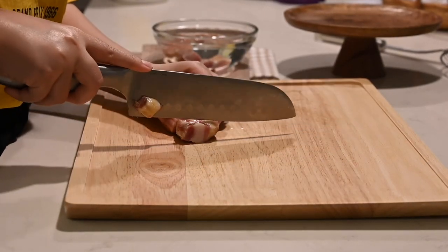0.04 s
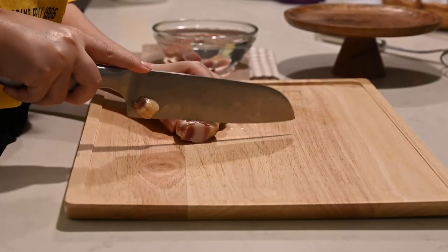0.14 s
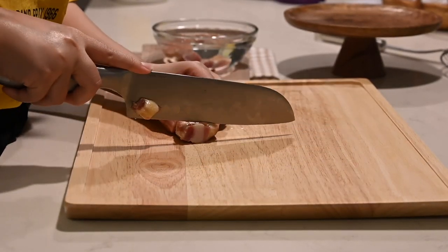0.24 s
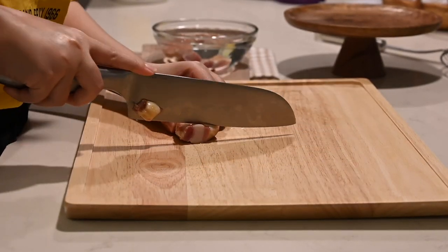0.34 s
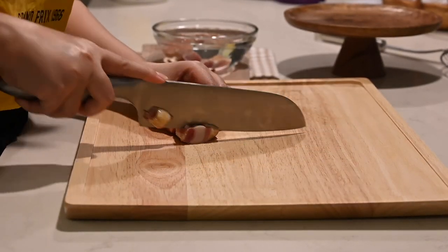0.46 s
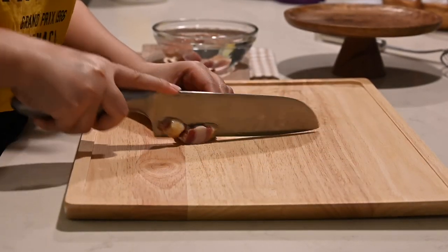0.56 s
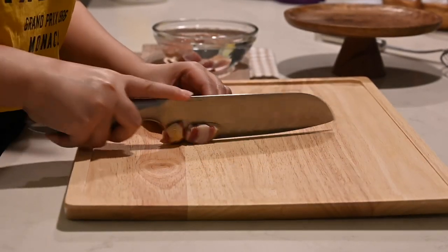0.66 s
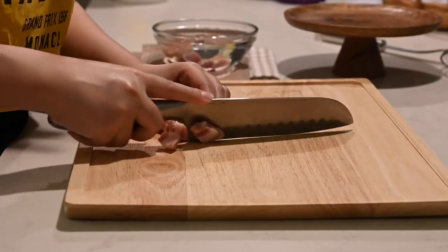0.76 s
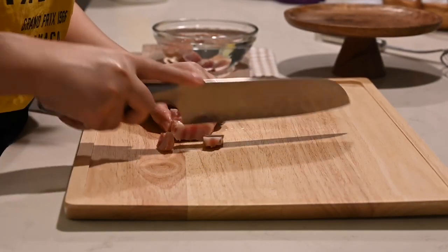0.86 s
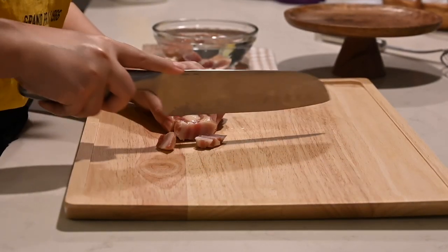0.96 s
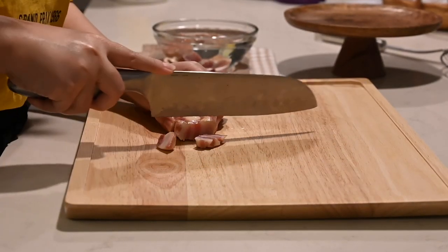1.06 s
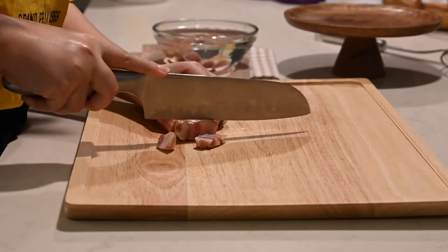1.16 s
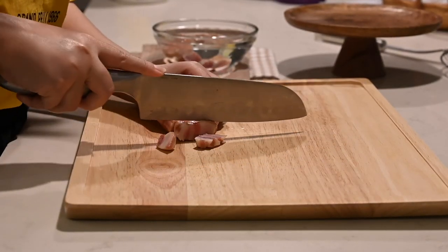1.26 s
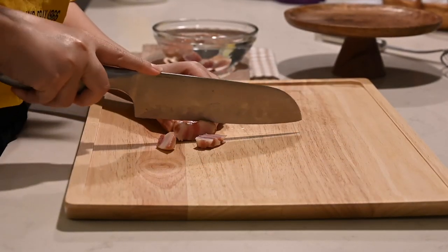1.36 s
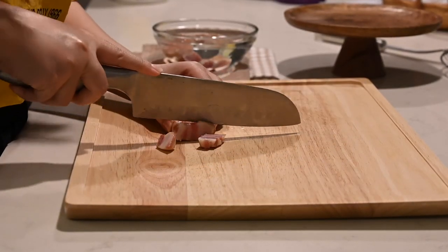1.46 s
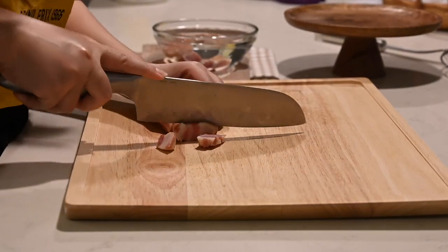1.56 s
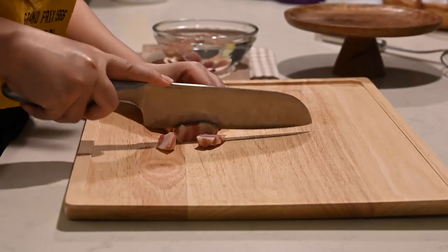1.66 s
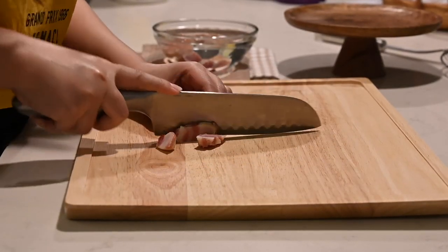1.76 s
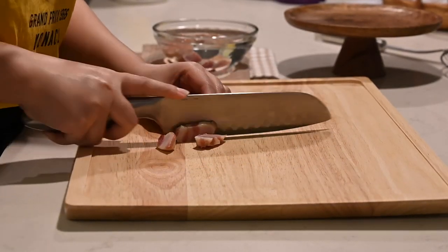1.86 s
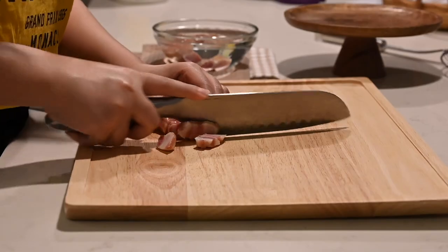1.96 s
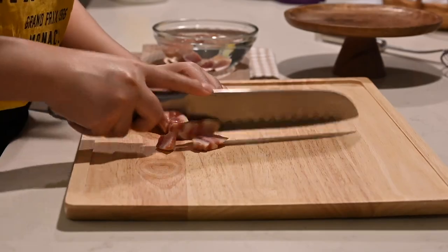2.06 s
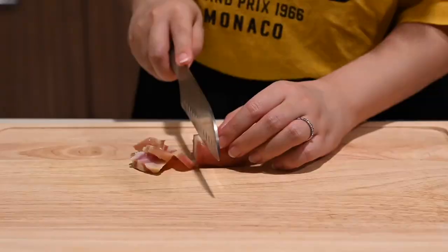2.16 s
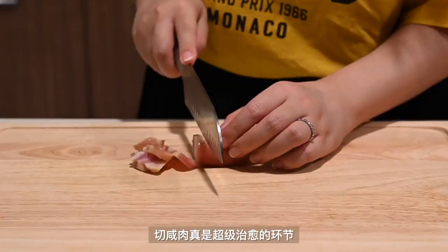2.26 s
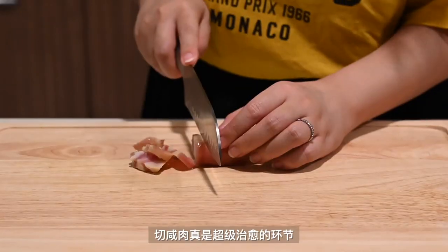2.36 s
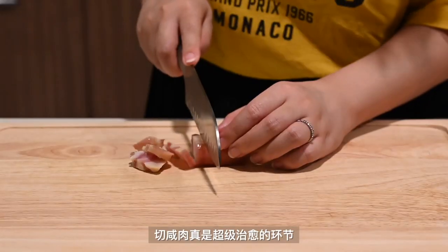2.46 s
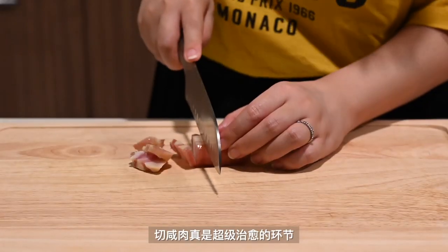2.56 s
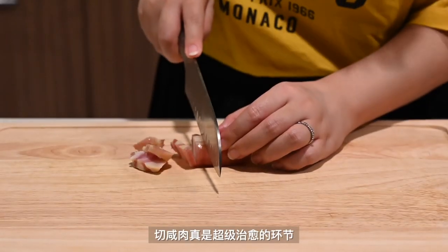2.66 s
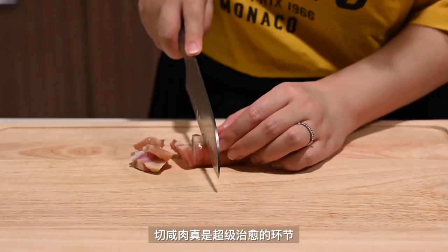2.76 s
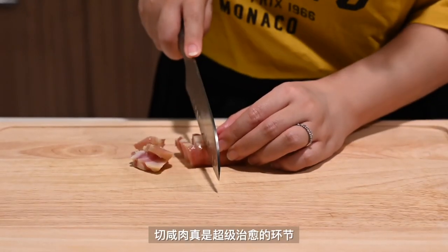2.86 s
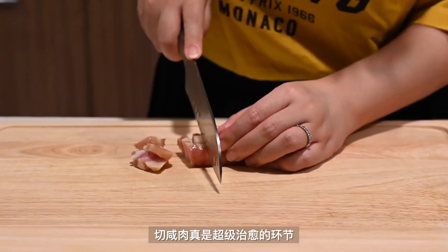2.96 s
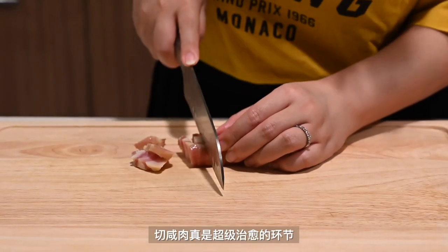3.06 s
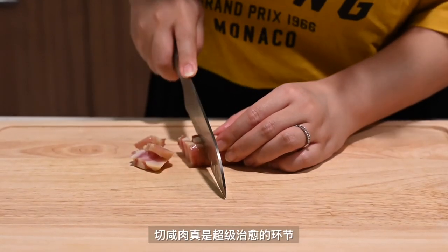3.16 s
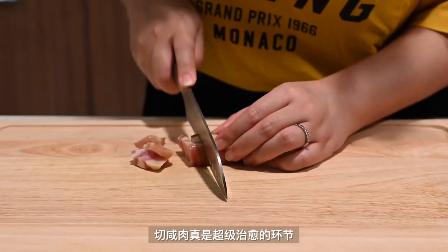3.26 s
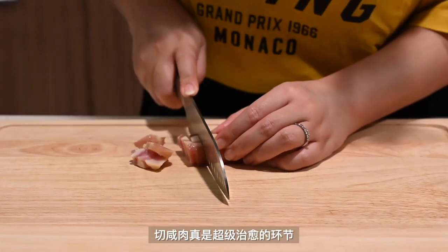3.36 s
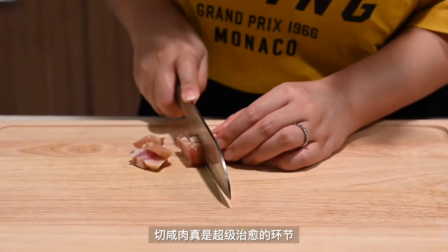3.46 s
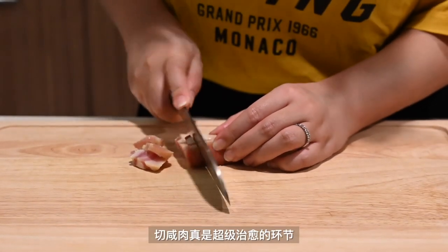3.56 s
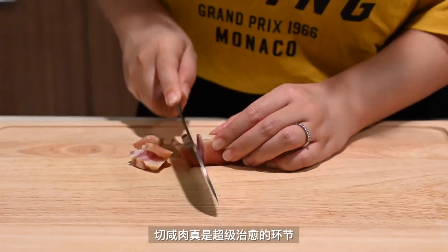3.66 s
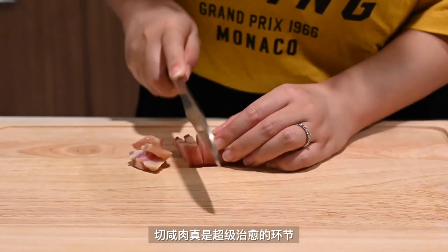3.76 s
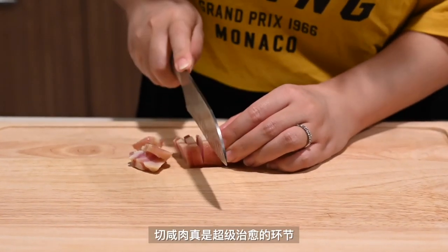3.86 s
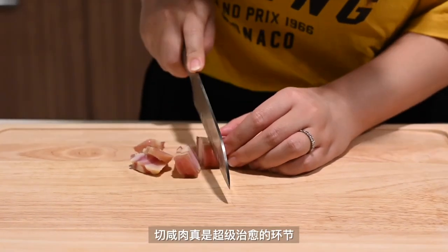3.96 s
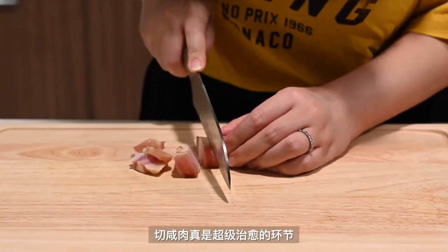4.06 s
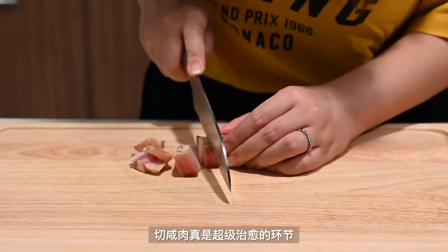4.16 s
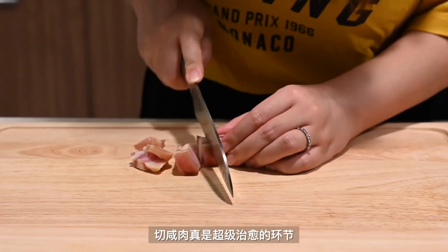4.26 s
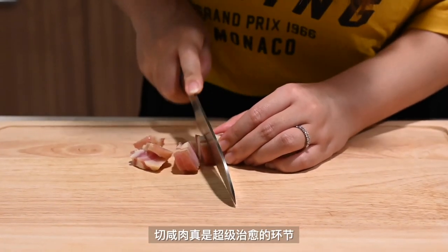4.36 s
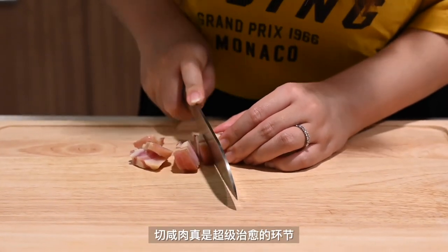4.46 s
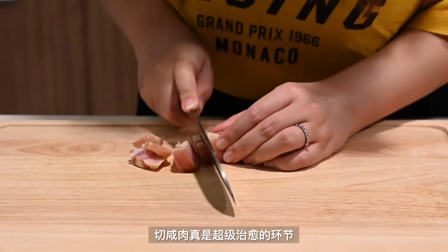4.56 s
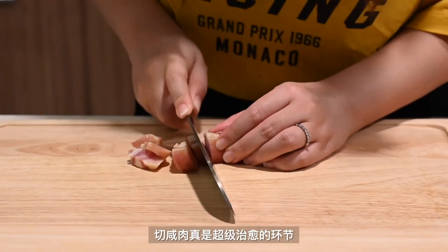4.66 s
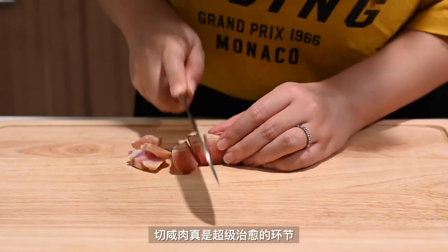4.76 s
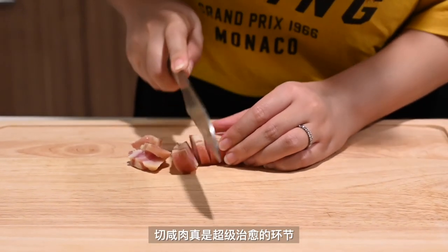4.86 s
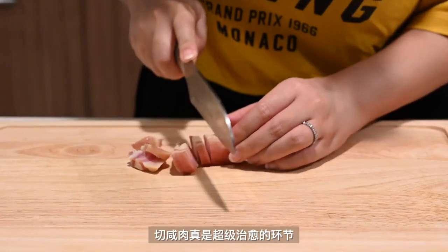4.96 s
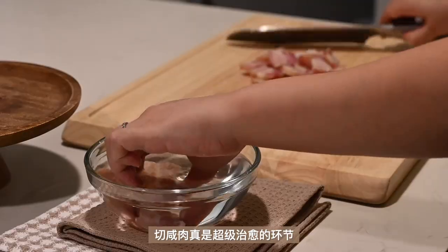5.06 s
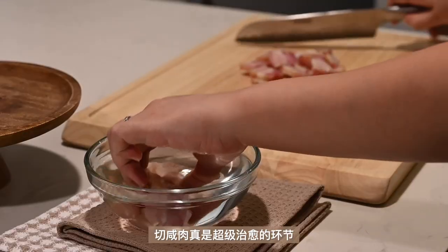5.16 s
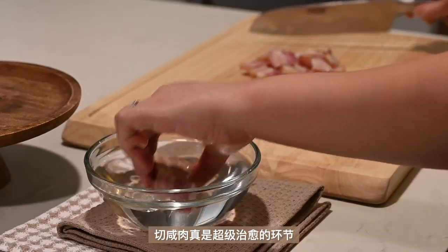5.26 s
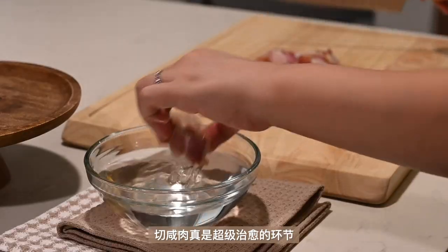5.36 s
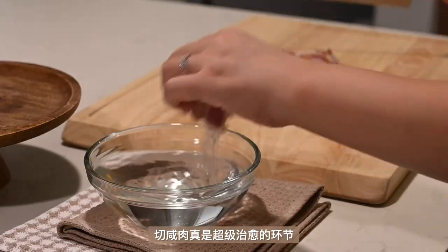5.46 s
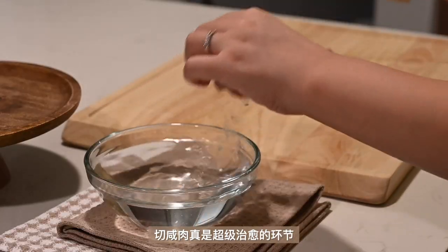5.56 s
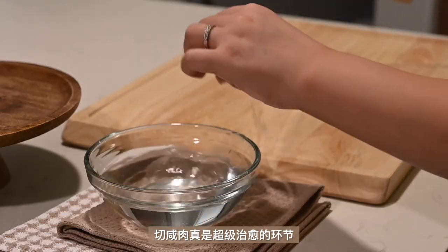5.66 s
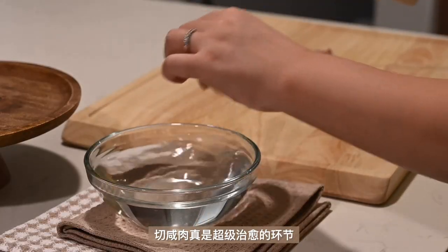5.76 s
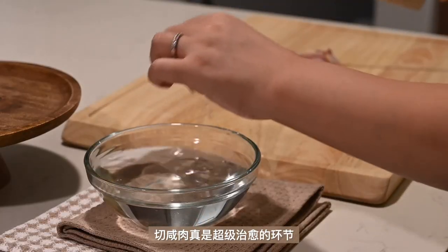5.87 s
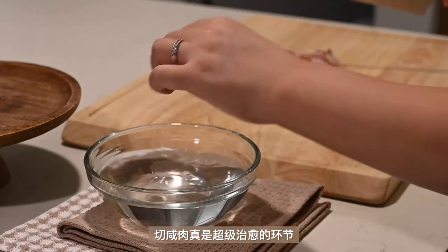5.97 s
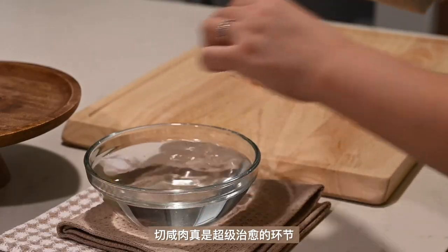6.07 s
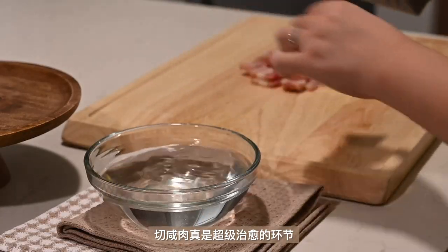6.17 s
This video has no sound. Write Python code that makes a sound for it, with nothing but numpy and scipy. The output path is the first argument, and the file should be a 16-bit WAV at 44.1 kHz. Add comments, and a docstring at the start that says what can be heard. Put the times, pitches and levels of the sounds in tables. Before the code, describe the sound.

In a quiet, hard-walled kitchen with a low fridge-like hum, a knife cuts cured meat with short gritty rasps and sharp woody knocks on a board. The first knocks are echoing, heard from the side; later ones are drier and closer, from the front. Finally a glass bowl is nudged and rings softly, a quick cluster of drips falls into water, and a hand lightly brushes wood twice.

```python
"""Knife and cured meat on a wooden board

A steel knife saws through cured meat (stick-slip noise) and knocks on a board (struck modes) in a hard-walled
kitchen, from the side, then the front; then, beside a glass bowl, the bowl is nudged and rings, water drips
(gliding bubbles over splashes, the glass ringing on) and a hand brushes wood (coloured noise). Under the room
noise hums what is likely a fridge; two close microphone ports hear the bass alike."""
import sys
import numpy as np
from scipy import signal
from scipy.fft import rfft, irfft
from scipy.io import wavfile
from scipy.ndimage import uniform_filter1d

SR = 44100
rng = np.random.default_rng(int(sys.argv[2]) if len(sys.argv) > 2 else 0)


def waveform_to_disk(signal):
    """Save audio, clipped to [-1, 1], as 16-bit WAV at the path in sys.argv[1]."""
    frames = np.transpose(np.atleast_2d(signal))
    scaled = np.clip(frames, -1, 1) * 32767
    samples = np.round(scaled).astype(np.int16)
    wavfile.write(sys.argv[1], SR, samples)


N = 274302
T = np.arange(N) / SR


def undb(db):
    """Amplitude factor of a level in dB."""
    return 10 ** (np.asarray(db) / 20)


def unit(x):
    """Scale to rms 1."""
    return x / np.sqrt(np.mean(x ** 2))


def ring(x, hz, t60):
    """One decaying mode driven by x: a complex one-pole resonator."""
    t60 = np.clip(t60, .003, 1.2)
    pole = np.exp(2j * np.pi * hz / SR - np.log(1000) / (t60 * SR))
    return signal.lfilter([1], [1, -pole], x).imag


def band(x, hz, width):
    """Resonance with gain 1 at its centre."""
    b, a = signal.iirpeak(hz, hz / width, SR)
    return signal.lfilter(b, a, x)


def highpass(x, order, hz):
    """Butterworth cut of everything below hz."""
    return signal.sosfilt(signal.butter(order, hz, "high", fs=SR, output="sos"), x)


def add(out, s, piece):
    """Mix a short sound in at time s."""
    i = int(s * SR)
    out[i:i + len(piece)] += piece[:N - i]


def walk(rate):
    """Random levels, a new one rate times a second, slewed from one to the next; spread near 1."""
    hold = max(int(SR / rate), 100)  # samples
    steps = np.repeat(rng.standard_normal(N // 100 + 1), hold)[:N]
    return 1.2 * uniform_filter1d(steps, hold)


def grains(spread_db):
    """Dense slips of uneven size."""
    sizes = undb(spread_db * rng.exponential(size=N))
    return unit(rng.standard_normal(N) * sizes)


def crack(t, t60, hz, width):
    """A short burst of noise around hz, dying away from rms 1."""
    burst = band(band(rng.standard_normal(len(t)), hz, width), hz, width)
    return unit(burst) * undb(-60 * t / t60)


def colour(x, peaks):
    """Steep resonances (each applied twice), rms 1."""
    return unit(sum(undb(db) * band(band(x, hz, width), hz, width) for hz, width, db in peaks))


def stroke(start, hold, rise_db_s, fall_db_s):
    """Gain of one movement: it swells to 1, holds, then dies away."""
    before = np.maximum(start - T, 0)
    after = np.maximum(T - start - hold, 0)
    return undb(-rise_db_s * before - fall_db_s * after)


def place(s):
    """Index of the microphone place at time s: side, front, beside the bowl."""
    # the microphone stands at a new place from each moment on: (time [s])
    moves = [0, 2.181, 4.96, 7]
    return np.searchsorted(moves, s, side="right") - 1


def background():
    """Room air in (mid, side) whose level drifts a little, with a wavering hum and drone, likely a fridge."""
    # spectrum of the room air, overall level set apart: (frequency [Hz], density [dB per Hz])
    air_spectrum = [(12, -63), (30, -2.5), (74, -5), (107, -6), (142, -3.5), (241, -3.5), (270, -16),
                    (347, -6.5), (499, -9), (825, -10.5), (1440, -14.5), (2750, -19.5), (16000, -32.5)]
    # room air at each microphone place: (level [dB])
    air_levels = [-61, -62.5, -62]
    # hum bands: (frequency [Hz], width [Hz], level from side [dB], from front [dB], by the bowl [dB])
    hum_bands = [(100, 2.7, -68, -73.5, -73), (205, 47, -69, -99, -76), (316.4, 39, -66, -70.5, -75.5),
                 (370, 220, -70.5, -76, -83), (55.7, 4.7, -80.5, -73, -68)]
    hz, db = np.transpose(air_spectrum)
    f = np.maximum(np.fft.rfftfreq(N, 1 / SR), 1)
    shape = undb(np.interp(np.log(f), np.log(hz), db))
    air = irfft(rfft(rng.standard_normal((2, N))) * shape, N)
    here = place(T)
    air = air / np.std(air[0]) * undb(np.array(air_levels)[here] + 0.13 * walk(2.72))
    for hum_hz, width, *levels in hum_bands:
        hum = unit(band(rng.standard_normal(N), hum_hz, width))
        air[0] += hum * undb(np.array(levels)[here])
    return air


def kitchen(echoes, room_db):
    """Response (mid, side): the direct sound, first echoes, then a tail that swells in and fades by band."""
    # decay of the room: (frequency [Hz], t60 [s])
    decay = [(125, 0.26), (250, 0.52), (500, 0.62), (1000, 0.63), (2000, 0.55), (4000, 0.11), (12000, 0.19)]
    t = np.arange(SR) / SR
    hz, t60 = np.transpose(decay)
    tail = np.zeros((2, SR))
    for f in 100 * 2. ** np.arange(0, 7.6, .5):
        fade = undb(-60 * t / np.interp(np.log(f), np.log(hz), t60))
        tail += band(rng.standard_normal((2, SR)), f, f / 2) * fade / np.sqrt(f)
    tail = np.diff(tail, prepend=0) + 0.11 * tail  # evens out the spectrum
    tail = highpass(tail, 4, 242)  # the room gives back little below this
    tail *= 1 - np.exp(-(t / .01) ** 2)
    out = undb(room_db) * tail / np.sqrt(np.sum(tail[0] ** 2))
    out[1] *= undb(-4)  # the tail is weaker in the side signal
    out[0, 0] += 1  # direct sound
    for ms, db, share in echoes:
        out[:, int(ms * SR / 1000)] += undb(db) * np.array([1, share])
    return out


def brushing():
    """Skin drags over the grain of the wood: uneven slips through broad resonances."""
    # hand over the board: (start [s], hold [s], level [dB])
    hand_strokes = [(5.842, 0.045, -61), (6.127, 0.012, -60.5)]
    # colour of skin on wood, each resonance applied twice: (frequency [Hz], width [Hz], gain [dB])
    skin_peaks = [(900, 650, -11), (1500, 1100, 5), (2100, 2800, 20), (3600, 2000, -13), (6650, 4000, -6)]
    drag = sum(undb(db) * stroke(s, hold, rise_db_s=169, fall_db_s=147) for s, hold, db in hand_strokes)
    return drag * colour(grains(3.3) * undb(0.63 * walk(30)), skin_peaks)


def water_and_ticks():
    """Tones that rise in pitch and waver as they fade, each over a splash: bubbles, and the glass ringing on;
    small ticks are short noise bursts."""
    # drops into the bowl; the two rows with t60 near half a second are the glass ringing on:
    # (time [s], peak [dB], frequency [Hz], t60 [s], upward glide [share of frequency])
    drips = [(5.52, -51.5, 4880, .025, 0.035), (5.53, -62, 10300, 0.0089, .04),
             (5.536, -47.5, 3700, 0.026, 0.19), (5.536, -56.5, 2220, 0.44, 0.015),
             (5.543, -56, 4800, 0.013, 0.33), (5.55, -61, 3300, 0.012, 0.23),
             (5.555, -60, 12900, .012, .03), (5.577, -47, 2990, 0.024, 0.022),
             (5.59, -54.5, 5950, 0.053, 0.092), (5.599, -68, 3320, 0.48, 0.015)]
    # small ticks: (time [s], starting level [dB], frequency [Hz], width [Hz])
    ticks = [(0.413, -66.5, 8400, 5000), (1.13, -64, 4440, 607), (1.235, -80, 11000, 4000),
             (1.295, -60.5, 3030, 800), (3.663, -57.5, 5780, 1500), (5.972, -62, 9500, 4000)]
    splash_db = -12.5  # relative to each row's tone
    out, t = np.zeros(N), np.arange(SR // 2) / SR
    for s, db, hz, t60, glide in drips:
        rise = glide * (1 - np.exp(-6 * t / t60))
        pitch = hz * (1 + rise + 0.032 * walk(141)[:len(t)])
        tone = undb(db - 60 * t / t60) * np.sin(2 * np.pi * np.cumsum(pitch) / SR)
        add(out, s, tone)
        add(out, s, undb(db + splash_db) * crack(t, 0.02, 4800, 8000))
    for s, db, hz, width in ticks:
        add(out, s, undb(db) * crack(t, 0.022, hz, width))
    return out


def nudged_bowl():
    """The bowl's foot slips briefly over the cloth and sets the glass ringing."""
    # modes of the glass bowl and the worktop under it: (frequency [Hz], gain [dB], t60 [s])
    bowl_modes = [(60, -5, 0.11), (280, -8, 0.1), (888, -5.5, 0.34), (1251, 4, 0.067), (1110, -4, .04),
                  (1350, -3, 0.055), (1510, -7, 0.036), (1800, 6, 0.0098), (2220, -11, 0.19),
                  (2900, -17, 0.036), (4002, -17, 0.42), (4560, -20, .03), (4870, -26, .15),
                  (5790, -31, 0.33), (8000, -22, 0.22), (9100, -17, 0.043), (9900, -21, .04),
                  (10840, -22, .05), (11700, -32, .08)]
    scrape = stroke(5.125, hold=0.022, rise_db_s=444, fall_db_s=600)
    slips = undb(-48) * scrape * grains(3.0)
    # reference: how strongly steady noise rings the first four modes
    reference = np.std(sum(undb(db) * ring(grains(0), hz, t60) for hz, db, t60 in bowl_modes[:4]))
    return sum(undb(db) * ring(slips, hz, t60) for hz, db, t60 in bowl_modes) / reference


def board(force, column, parts_db, longer=1):
    """The board's modes, driven by force; each radiates only near its own pitch."""
    # the first mode is the board bouncing on the worktop:
    # (frequency [Hz], t60 before longer [s], gain from the side [dB], gain from the front [dB])
    board_modes = [(149.9, 0.27, -24.5, -16), (299, 0.016, -22.5, -8.5), (361, 0.025, -13, -4.5),
                   (489, 0.043, -30, -3), (548.7, 0.038, -2, -1), (696.4, 0.032, 0.5, -1.5),
                   (987, 0.02, 6, -2.5), (1054, 0.018, 7, 8), (1205, 0.022, -13, -13),
                   (1502, 0.029, -16.5, -9.5), (1828, 0.0054, -9, 7), (2126, 0.023, -3, -7.5),
                   (2536, 0.0066, 0.5, -2), (3074, 0.0053, 8.5, -12), (3700, 0.0074, 8, -24),
                   (4680, 0.017, -54, -35), (5500, 0.004, -57, -67)]
    # from the side the bounce is a short dull thump: (frequency [Hz], t60 before longer [s], gain [dB])
    side_bounce = (111, 0.039, -23)
    low_hz, high_hz = 420, 1500  # low modes lie below, high modes above
    bounce_db, low_db, high_db = parts_db
    modes = []
    for k, (hz, t60, *gains) in enumerate(board_modes):
        if k == column == 0:
            hz, t60, gains[0] = side_bounce
        if k == 0:
            part_db = bounce_db
        else:
            part_db = low_db * (hz < low_hz) + high_db * (hz > high_hz)
        ringing = ring(force, hz, longer * t60)
        radiated = band(band(ringing, hz, hz), hz, 1.2 * hz)
        modes.append(undb(gains[column] + part_db) * radiated)
    # the board is too small to send its bending modes' bass into the air
    bending = highpass(sum(modes[1:]), 3, 250)
    return modes[0] + bending


def knocks():
    """Each knock is a half-sine push; a longer contact leaves the high modes still; a crack is added."""
    # blade on board, and soft thuds as the board bounces again (3.529, 4.547):
    # (time [s], peak before the crack [dB], contact [ms], board bounce [dB], low modes [dB], high modes [dB])
    hits = [(0.5575, -18, 0.39, -16, 11, 8.5), (0.669, -34, 1.54, 13, 6, 0), (.687, -31.5, 2.2, 5, 12, -1),
            (0.7691, -28.5, 0.73, -13, 5.5, 5.5), (1.7578, -15.5, 0.4, -6, 9.5, 6.5),
            (1.877, -49, 2.7, 27, 14, 0), (1.892, -43, 2.4, 13, 22, 0), (2.034, -19, 0.4, -34, 7, 2.5),
            (3.1535, -24.5, 0.21, -7.5, 8.5, -1), (3.472, -34.5, 0.42, 3, 7, -17),
            (3.475, -37.5, 3.8, 18, 23, -2), (3.529, -51, 3.5, 18, -6, -4), (4.28, -46.5, 1.4, 8, 10.5, 0),
            (4.3686, -8.5, 0.28, -19, 0, -0.5), (4.4974, -29, 0.19, 6, 4, 26),
            (4.498, -18, 1.26, -3.5, 9.5, -12), (4.547, -39, 2.1, 17, 1, -2),
            (4.6378, -19.5, 0.56, -4.5, 5, 6.5), (4.7669, -33.5, 0.097, 11, -15, 28.5)]
    out, t = np.zeros(N), np.arange(SR // 3) / SR
    for s, db, ms, *parts_db in hits:
        push = np.sin(np.pi * np.clip(t * 1000 / max(ms, .05), 0, 1))
        knock = board(push, place(s), parts_db)
        crack_db = -38 + 0.8772 * parts_db[2]  # more crack on knocks that ring the high modes
        edge = undb(crack_db) * crack(t, .012, 3200, 4500)
        add(out, s, undb(db) * (knock / np.abs(knock).max() + edge))
    return out


def sawing():
    """Stick and slip: the slips hiss along the edge and rub the board's modes."""
    # strokes through meat and over wood: (start [s], hold [s], edge hiss [dB], board rub [dB])
    saw_strokes = [(0.604, 0.038, -62, -52.5), (0.715, 0.024, -58.5, -56), (0.798, 0.034, -72, -62.5),
                   (1.798, 0.051, -64.5, -51), (1.867, .12, -63.5, -66), (2.04, 0.062, -70.5, -54.5),
                   (2.633, .11, -65, -65.5), (3.156, 0.033, -66, -58), (3.281, 0.021, -66, -56),
                   (3.345, 0.0085, -57.5, -50.5), (3.417, 0.055, -59, -50.5), (3.53, 0.12, -60, -53),
                   (4.3, 0.057, -76, -80), (4.377, .06, -58, -51), (4.472, 0.015, -53, -47),
                   (4.549, 0.082, -53.5, -52), (4.694, 0.14, -64.5, -62)]
    # colour of the edge hiss, each resonance applied twice: (frequency [Hz], width [Hz], gain [dB])
    edge_peaks = [(1710, 300, -18), (2400, 1840, 32.5), (3330, 2400, 15.5), (4800, 7900, 0),
                  (6700, 4500, -2), (9500, 620, -11), (12100, 1400, 5)]
    slips = grains(2.0) * undb(2.5 * walk(70))
    hiss = colour(slips, edge_peaks)
    rub = unit(board(slips, 1, (0, 0, 6), longer=0.77))
    out = np.zeros(N)
    for s, hold, edge_db, rub_db in saw_strokes:
        movement = stroke(s, hold, rise_db_s=252, fall_db_s=266)
        out += movement * (undb(edge_db) * hiss + undb(rub_db) * rub)
    return out


def scene():
    """Each place hears only what sounds while the microphone stands there; gives (left, right)."""
    # first echoes from ceiling, wall and cupboards, one list for each place, the last close to the bowl:
    # (delay [ms], level [dB], side signal [share of mid])
    first_echoes = [
        [(5.12, 3.5, 0.11), (15.12, -4, .3), (29.23, -6, -0.25)],
        [(5.785, -7, 0.19), (13.62, -16, 0.12), (23.48, -20, -.2)],
        [(5.91, -12, 0.19), (15.26, -7.5, 0.56), (24.5, -17, -0.16)],
    ]
    # reverberant tail at each place: (level [dB])
    tail_levels = [3.5, -6, -7.5]
    dry = knocks() + sawing() + nudged_bowl() + water_and_ticks() + brushing()
    out = background()
    for k, (echoes, room_db) in enumerate(zip(first_echoes, tail_levels)):
        here = place(T) == k
        heard = signal.fftconvolve((dry * here)[None], kitchen(echoes, room_db), axes=1)[:, :N]
        out += here * heard
    mid, side = out
    return np.array([mid + side, mid - side])


def record(dry):
    """Close ports lose the side signal in the bass; the left leans toward the board; the top is cut."""
    mid, side = (dry[0] + dry[1]) / 2, (dry[0] - dry[1]) / 2
    side = highpass(side, 4, 1025) + undb(-42) * side  # a little bass leaks into the side
    left = undb(3.5)  # left over right, around 6400 Hz
    side = side + (left - 1) / (left + 1) * band(mid, 6400, 7800)
    top_cut = signal.ellip(10, .2, 70, 15750, fs=SR, output="sos")
    return signal.sosfilt(top_cut, np.array([mid + side, mid - side]))


dry = scene()
out = record(dry)
waveform_to_disk(out)
```